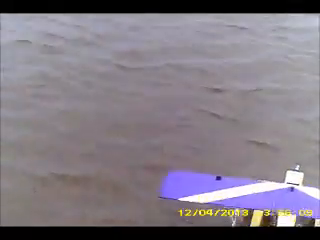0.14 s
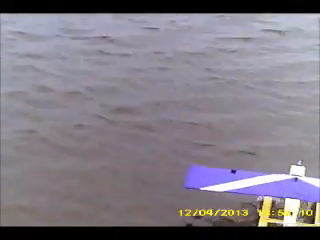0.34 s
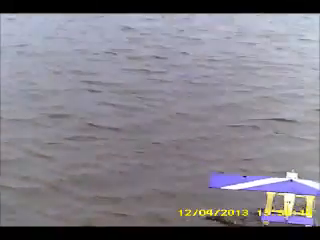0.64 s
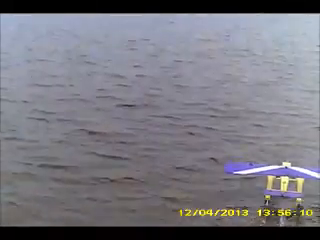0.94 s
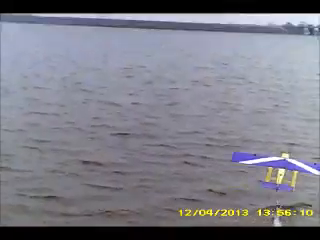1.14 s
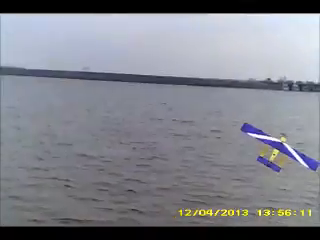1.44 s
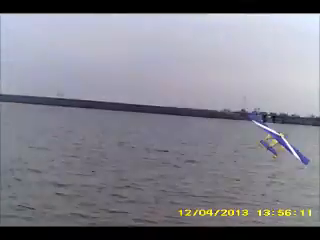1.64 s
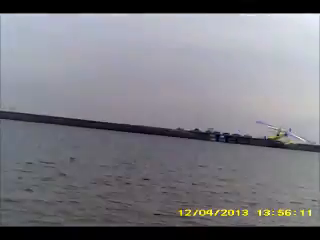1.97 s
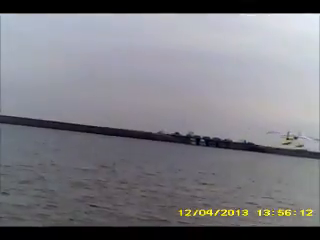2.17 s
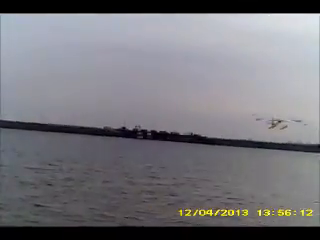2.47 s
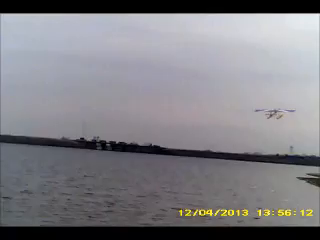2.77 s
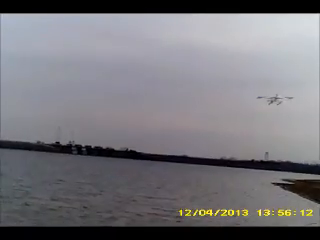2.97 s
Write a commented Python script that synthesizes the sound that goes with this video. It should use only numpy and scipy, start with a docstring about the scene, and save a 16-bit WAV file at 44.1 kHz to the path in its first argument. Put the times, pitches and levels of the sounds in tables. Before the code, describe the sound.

A small electric model plane buzzes away over water, with splashy hiss and growing wind rumble.

```python
"""A buzzing propeller and a splashy hiss: a small electric model floatplane skims off a lake and flies away.
Blades and motor magnets sing at multiples of the shaft speed; the floats fizz and slap through
the ripples until they lift. Wind rumbles ever harder on the microphone and pops, most of all in one gust.
The little camera on the shore adds a boxy colour, a faint hiss and a thin whine."""
import sys
import numpy as np
from scipy import signal
from scipy.fft import rfft, irfft, next_fast_len
from scipy.io import wavfile
from scipy.ndimage import uniform_filter1d, map_coordinates

SR = 44100
rng = np.random.default_rng(int(sys.argv[2]) if len(sys.argv) > 2 else 0)


def store_wav(level_fs):
    """Save 16-bit WAV to argv[1]."""
    pcm = np.round(np.clip(np.atleast_2d(level_fs), -1, 1) * 32767)
    wavfile.write(sys.argv[1], SR, pcm.T.astype(np.int16))


N = 137151

# shaft speed as heard, sinking as the plane speeds away: time_s, speed_hz
SHAFT_SPEED = [(0, 139.3), (.05, 139.7), (.13, 139.25), (.23, 139.1), (.3, 138.8), (.39, 138.9),
               (.48, 138.25), (.64, 138.25), (.83, 137.7), (1.1, 137.1), (1.8, 136.7), (3.1, 136.6)]
# fade of the propeller buzz: time_s, level_db
BUZZ_LEVEL = [(0, -31.5), (.07, -34), (.16, -37), (.4, -38.5), (.55, -46.5), (.7, -47.5), (1.2, -50),
              (2, -55.5), (3.1, -65)]
# tones of the two blades and the motor's magnets: shaft_multiple, level_db
BUZZ_TONES = [(1, -11), (2, 2), (3, -8), (4, -13), (6, -19), (7, -14.5), (8, -18.5), (12, -20.5), (14, -19),
              (21, -35.5), (28, -29)]
# the motor whine drifting in and out: time_s, level_db
WHINE_LEVEL = [(0, -66), (.13, -61), (.27, -68), (.34, -68), (.42, -81), (.54, -65), (.62, -73),
               (.79, -69.5), (.88, -83), (1, -77), (1.09, -72), (1.23, -76), (1.3, -81), (1.41, -74),
               (1.51, -71), (1.63, -85), (1.7, -77), (1.83, -75), (1.96, -72), (2.15, -76), (2.3, -81.5),
               (2.8, -77.5), (3.1, -81)]
# fade of the spray and propeller wash: time_s, level_db
WASH_LEVEL = [(0, -33), (.13, -37), (.22, -39), (.4, -40.5), (.65, -39.5), (.82, -43), (1.2, -43.5),
              (1.4, -46.5), (1.68, -48), (1.8, -51.5), (3.1, -58)]
# colour of the propeller wash: frequency_hz, gain_db
WASH_EQ = [(60, -20), (180, 7.5), (350, 7.5), (600, -6.5), (1050, -5.5), (1450, 0.5), (2000, -3),
           (3000, -5), (10000, -8)]
# fade of the fine mist behind the floats: time_s, level_db
MIST_LEVEL = [(0, -36), (.1, -38.5), (.25, -39), (.4, -36.5), (.6, -39.5), (.9, -42), (1.05, -48.5),
              (1.35, -51.5), (1.52, -45.5), (1.8, -52), (2.1, -60), (3.1, -78)]
# bright sizzle of the mist: frequency_hz, gain_db
MIST_EQ = [(1500, -25.5), (2600, -6), (3900, 5.5), (5500, -5.5), (10000, -5.5)]
# gusts on the microphone: time_s, rumble_db, flutter_db
GUSTS = [(0, -47, -47), (.15, -41, -43.5), (.6, -36.5, -36), (.85, -37.5, -42.5), (1.15, -36, -42),
         (1.27, -33.5, -44.5), (1.36, -37, -43), (1.69, -33.5, -34), (1.8, -35.5, -36),
         (1.98, -38.5, -36.5), (2.1, -32, -32.5), (2.32, -33.5, -33), (2.5, -37, -32.5), (2.65, -29, -32),
         (2.78, -34.5, -34.5), (2.93, -32, -28.5), (3.03, -30.5, -26.5), (3.1, -32, -25)]
# the wind's deep rumble: frequency_hz, gain_db
RUMBLE_EQ = [(10, -34), (25, -2), (45, -2), (70, -1), (105, -1), (200, -15), (400, -35.5), (1000, -71)]
# the wind's low-mid flutter: frequency_hz, gain_db
FLUTTER_EQ = [(30, -22), (90, -5), (150, 0.5), (225, 1), (300, -5.5), (400, -11), (550, -19), (800, -26.5),
              (1200, -30.5), (2000, -41), (5000, -60)]
# eddies popping on the microphone: start_s, level_db, pitch_hz, decay_cycles
WIND_POPS = [(2.126, -25, 500, 1.2), (2.186, -21, 655, .8), (2.603, -17, 700, 0.57),
             (2.618, -11, 653, 1.56), (2.628, -18.5, 388, 2.2), (2.638, -13.5, 305, 1.1),
             (2.643, -17.5, 600, 0.66), (2.650, -10.5, 408, 0.64), (2.663, -12, 890, 0.43),
             (2.668, -15, 388, 1), (2.687, -17.5, 414, 1.14), (3.089, -21.5, 800, 1.2)]
# steady bed of open lake: frequency_hz, gain_db
LAKE_EQ = [(100, -10.5), (400, -2), (650, -5.5), (930, 1), (1400, -10.5), (2000, -12.5), (4000, -12.5),
           (10000, -14.5)]
# floats slapping ripples: start_s, level_db, pitch_hz, length_s
FLOAT_SLAPS = [(0.067, -30, 975, 0.012), (0.295, -38, 1100, .01), (0.325, -34.5, 1151, 0.016),
               (0.383, -36.5, 1090, .02), (0.435, -32.5, 837, .006), (0.476, -33, 972, .018),
               (0.509, -41, 1945, .018), (0.561, -34, 1630, .014), (0.636, -32, 1770, .014),
               (0.639, -36.5, 815, .016), (0.71, -37, 1740, .012), (.736, -36.5, 1170, .01),
               (0.973, -43.5, 1760, 0.011), (1.057, -37, 1356, 0.018), (1.239, -39, 1517, .018)]
# sharp flicks of spray: start_s, level_db
SPRAY_FLICKS = [(0.063, -40), (.07, -33.5), (.074, -33.5), (0.444, -46), (0.455, -38), (0.485, -33),
                (0.579, -35), (.741, -47), (0.896, -37.5)]
# crisp colour of a flick: frequency_hz, gain_db
FLICK_EQ = [(300, -1), (1000, -2.5), (2000, 0), (4200, 1), (6000, -2), (10000, -7)]
# boxy colour of the microphone's small port: frequency_hz, gain_db
MIC_PORT_EQ = [(700, 0), (1120, -0.5), (1430, -4.5), (1700, 0), (1850, 1.5), (1960, 3), (2080, -3),
               (2240, -5), (2430, -16.5), (2800, -15), (3150, -27), (3550, -18), (3920, -13), (4400, -21),
               (5200, -29.5), (5900, -22), (6600, -39.5), (7600, -25.5), (8600, -39), (9500, -29),
               (10400, -56.5)]
# camera hiss, with a fuzzy peak at the lower whine tone: frequency_hz, gain_db
CAMERA_HISS_EQ = [(300, -2), (2300, 4), (2900, 1.5), (4200, -7), (5000, -8), (6300, -14), (7200, -13.5),
                  (7350, 0.5), (7500, -16.5), (9500, -25), (10500, -33.5)]
# the camera's thin whine: pitch_hz, level_db
CAMERA_WHINE = [(7349, -81), (10705, -85.5)]


def amp(db):
    """Decibels to gain."""
    return 10 ** (np.asarray(db) / 20)


def unit(x):
    """Scaled to rms 1."""
    return x / np.sqrt(np.mean(x ** 2) + 1e-20)


def curves(rows):
    """An automation curve for each column after the time."""
    times, *columns = np.transpose(rows)
    return [np.interp(np.arange(N) / SR, times, column) for column in columns]


def wobble(rate_hz):
    """Smooth random drift through rate_hz points a second."""
    knots = rng.standard_normal(int(N * rate_hz / SR) + 4)
    return map_coordinates(knots, [np.arange(N) * rate_hz / SR])


def equalise(x, eq):
    """Shape x with a minimum-phase EQ curve."""
    size = 2 * next_fast_len(N)
    hz, db = np.transpose(eq)
    gain_db = np.interp(np.log(np.fft.rfftfreq(size, 1 / SR) + 1), np.log(hz), db)
    cepstrum = irfft(np.log(amp(gain_db)))
    cepstrum[1:size // 2] *= 2  # folded, so nothing rings ahead of a hit
    cepstrum[size // 2 + 1:] = 0
    return irfft(rfft(x, size) * np.exp(rfft(cepstrum)), size)[:N]


def noise(eq):
    """Coloured noise of rms 1."""
    return unit(equalise(rng.standard_normal(N), eq))


def pings(start_s, gain, hz, decay_cycles):
    """A mix of short damped sines with soft attacks."""
    t = np.arange(SR // 20) / SR
    cycles = hz[:, None] * t
    attack = 1 - np.exp(-np.pi * cycles)
    decay = np.exp(-cycles / np.reshape(decay_cycles, (-1, 1)))
    waves = gain[:, None] * np.sin(2 * np.pi * cycles) * decay * attack
    at = (start_s * SR).astype(int)[:, None] + np.arange(len(t))
    return np.bincount(at.ravel(), waves.ravel(), N)[:N]


def shaft_tones(angle, tones, waver_db):
    """Harmonics of the turning shaft, each wavering in level on its own."""
    out = np.zeros(N)
    for multiple, db in tones:
        gain = np.sqrt(2) * amp(db + waver_db * wobble(25))
        out += gain * np.sin(multiple * angle + rng.uniform(0, 2 * np.pi))
    return out


def motor(angle, whine_multiple=42):
    """Propeller buzz and the 14-pole motor's whine, both locked to the shaft."""
    buzz = amp(curves(BUZZ_LEVEL)[0]) * shaft_tones(angle, BUZZ_TONES, waver_db=1.0)
    whine = amp(curves(WHINE_LEVEL)[0]) * shaft_tones(angle, [(whine_multiple, 0)], waver_db=1.9)
    return buzz + whine


def wash(angle, chop_depth=0.79, bubbles_per_s=900, bubble_hz=1282.3):
    """Air chopped by the blades and fine bubbles in the floats' wake fade with distance."""
    chop = 1 + chop_depth * np.cos(2 * angle)
    air = noise(WASH_EQ) * chop * amp(0.3 * wobble(40.3))
    when, faintness, pitch = rng.random((int(bubbles_per_s * N / SR), 3)).T
    hz = bubble_hz * np.exp(0.6954 * (2 * pitch - 1))  # about an octave either way
    gain = amp(-4 * np.log(faintness + 0.042))  # many soft, a few loud
    bubbles = unit(pings(when * N / SR, gain, hz, decay_cycles=9))
    return amp(curves(WASH_LEVEL)[0]) * (amp(3) * air + amp(-2) * bubbles)


def mist(grain_db=2, spurt_db=1):
    """Tiny droplets fizz in quick spurts."""
    level = amp(curves(MIST_LEVEL)[0] + spurt_db * wobble(43))
    fizz = noise(MIST_EQ) * amp(grain_db * wobble(500))
    return level * unit(fizz)


def eddies(eq, window_s=0.14):
    """Turbulence, levelled so that only the gusts make it swell."""
    turbulence = noise(eq)
    power = np.abs(uniform_filter1d(turbulence ** 2, int(window_s * SR)))
    return turbulence / np.sqrt(power + 1e-9)


def wind(waver_db=0.56):
    """Deep rumble and faster flutter ride the gusts; the strongest eddies pop."""
    rumble_db, flutter_db = curves(GUSTS)
    rumble = amp(rumble_db) * eddies(RUMBLE_EQ)
    flutter = amp(flutter_db + waver_db * wobble(45)) * eddies(FLUTTER_EQ)
    start_s, db, hz, decay_cycles = np.transpose(WIND_POPS)
    return rumble + flutter + pings(start_s, amp(db), hz, decay_cycles)


def lake(level_db=-47):
    """Open water lays a soft, steady wash under everything."""
    return amp(level_db) * noise(LAKE_EQ)


def flicks(attack_s=0.001, decay_s=0.004, boost_db=12):
    """Flung spray lands as bright ticks of noise."""
    envelope = np.zeros(N)
    for start_s, db in SPRAY_FLICKS:
        age = np.maximum(np.arange(N) / SR - start_s, 0)
        envelope += amp(db) * np.minimum(age / attack_s, 1) * np.exp(-age / decay_s)
    return amp(boost_db) * envelope * noise(FLICK_EQ)


def slaps(bubbles=24, pitch_spread=0.14):
    """Each slap of a float on a ripple throws a tight cluster of ringing bubbles."""
    out = np.zeros(N)
    for start_s, db, pitch_hz, length_s in FLOAT_SLAPS:
        onsets = start_s + length_s * rng.random(bubbles)
        gain = rng.uniform(0.42, 1, bubbles)
        hz = pitch_hz * np.exp(pitch_spread * rng.standard_normal(bubbles))
        cluster = pings(onsets, gain, hz, decay_cycles=8)
        out += amp(db) * cluster * np.sqrt(length_s * SR / np.sum(cluster ** 2))
    return out


def scene():
    """The mono mix: the motor on top of air and water, which the microphone's port turns boxy."""
    shaft_hz = curves(SHAFT_SPEED)[0] * (1 + 0.00047 * wobble(25))
    angle = 2 * np.pi * np.cumsum(shaft_hz) / SR
    air_and_water = wash(angle) + mist() + slaps() + flicks() + wind() + lake()
    return (motor(angle) + equalise(air_and_water, MIC_PORT_EQ))[None]


def record(dry):
    """The camera adds its hiss and thin whine, then cuts the top end off steeply."""
    t = np.arange(N) / SR
    hiss = amp(-64.5) * noise(CAMERA_HISS_EQ)
    whine = sum(np.sqrt(2) * amp(db) * np.sin(2 * np.pi * hz * t) for hz, db in CAMERA_WHINE)
    high_cut = signal.ellip(10, 0.1, 90, 10900, fs=SR, output="sos")
    return signal.sosfilt(high_cut, dry + hiss + whine)


dry = scene()
out = record(dry)
store_wav(out)
```